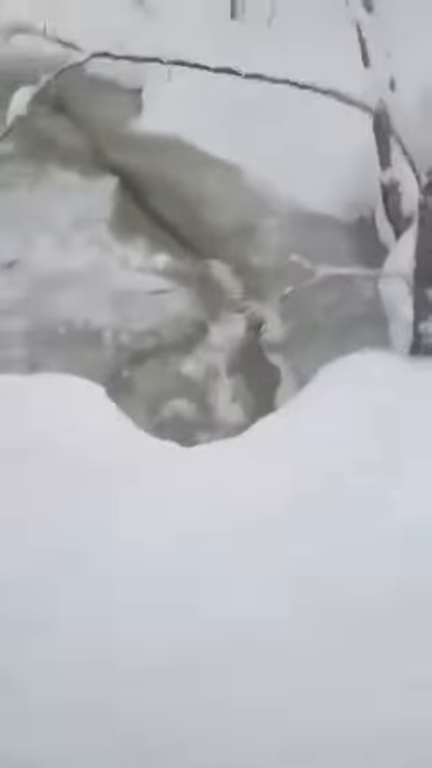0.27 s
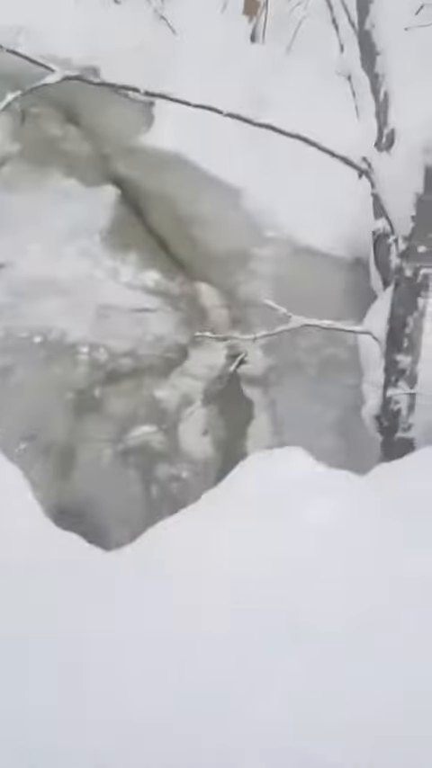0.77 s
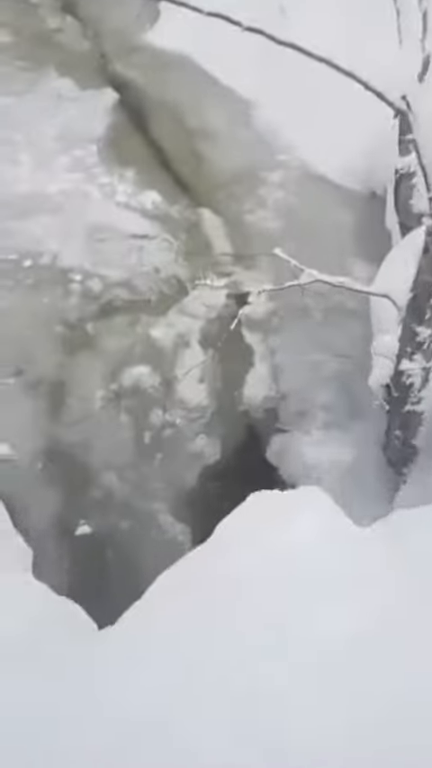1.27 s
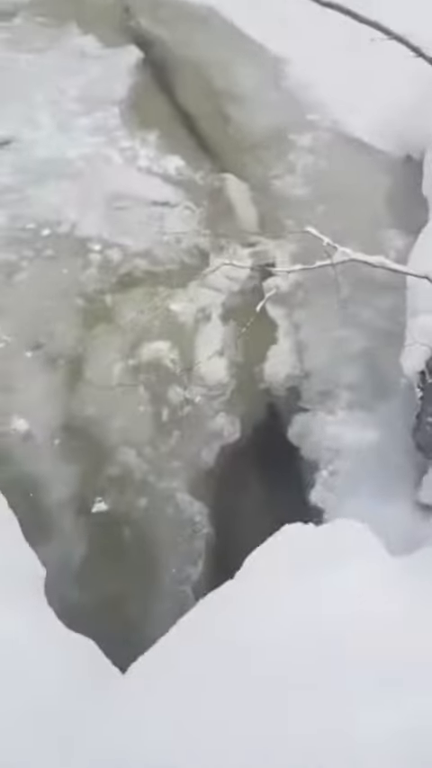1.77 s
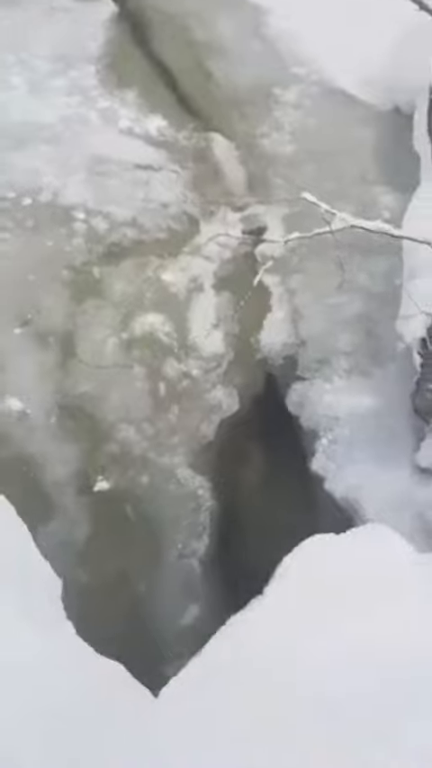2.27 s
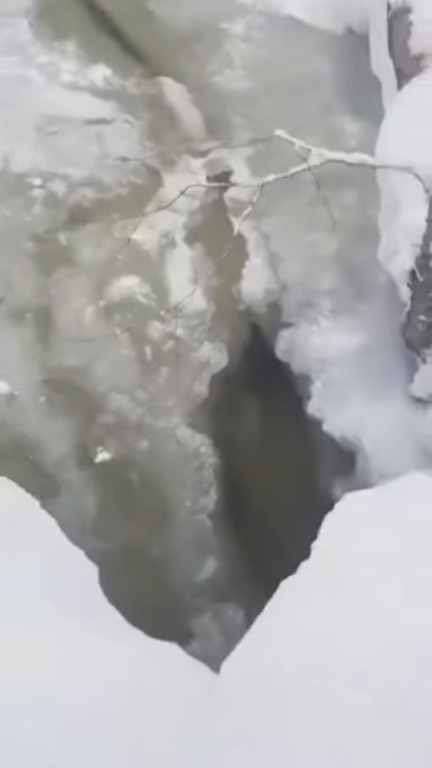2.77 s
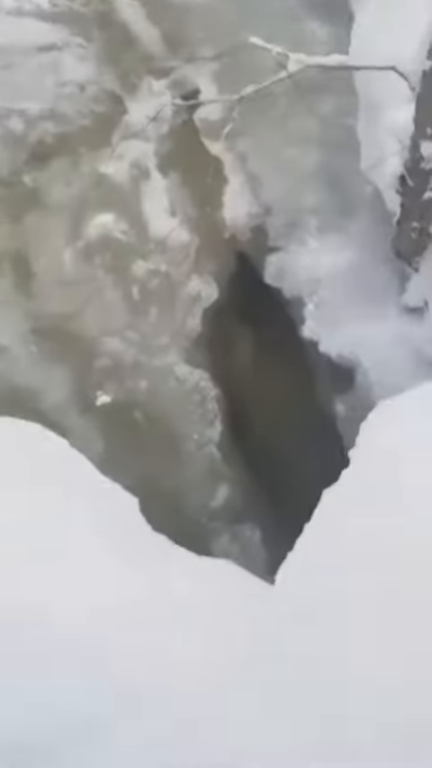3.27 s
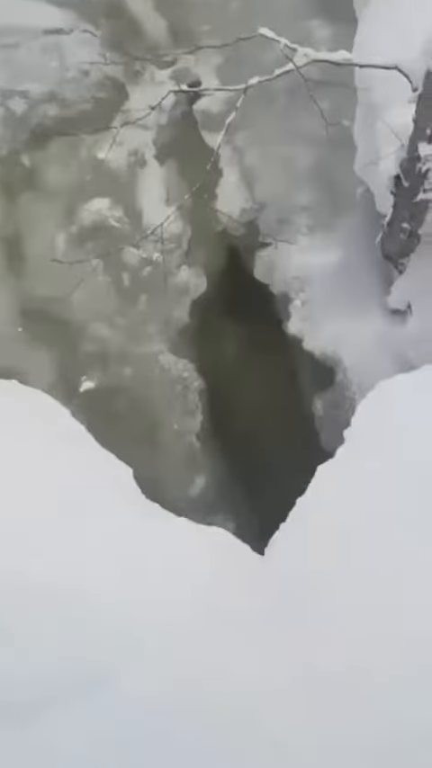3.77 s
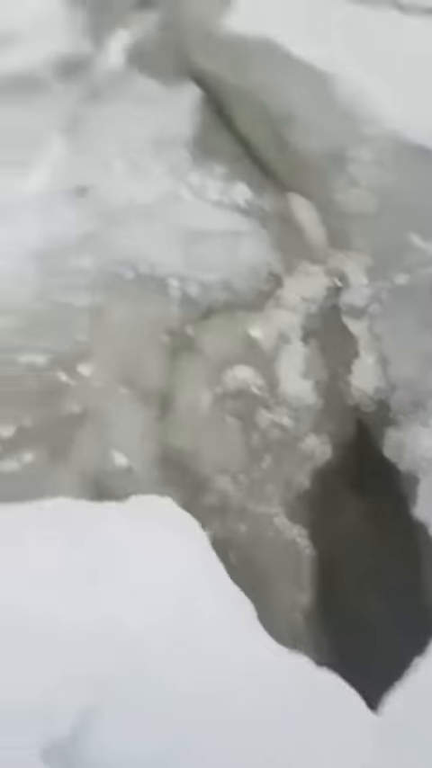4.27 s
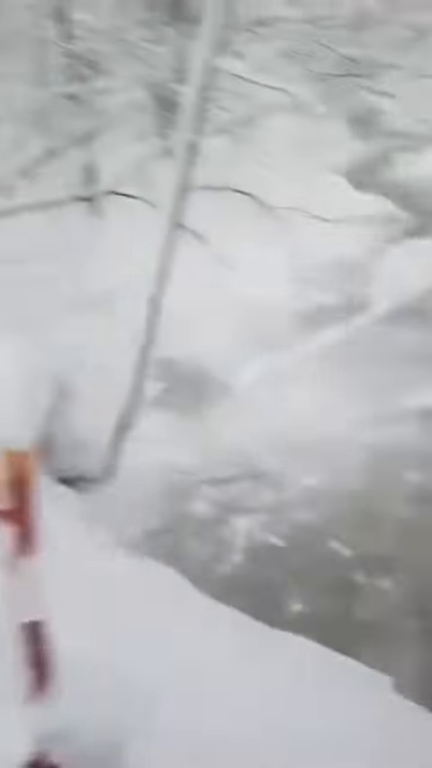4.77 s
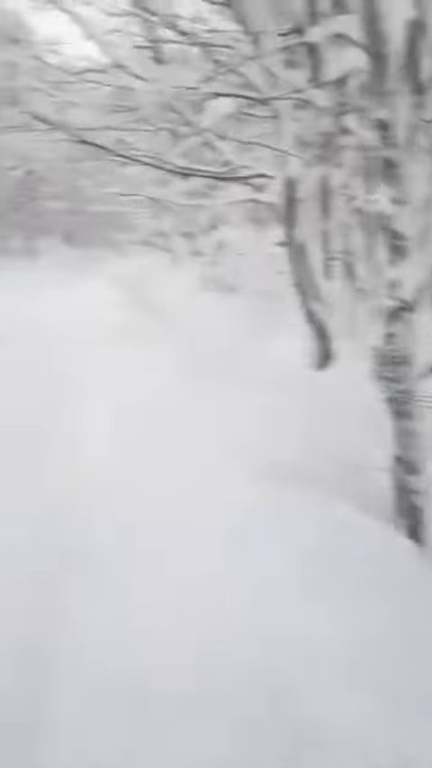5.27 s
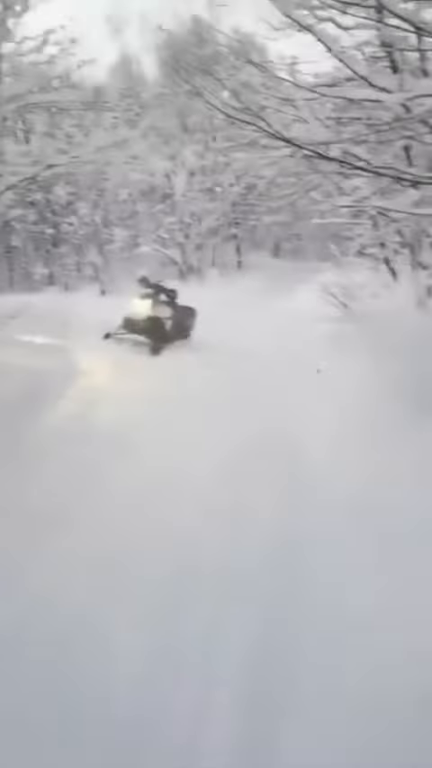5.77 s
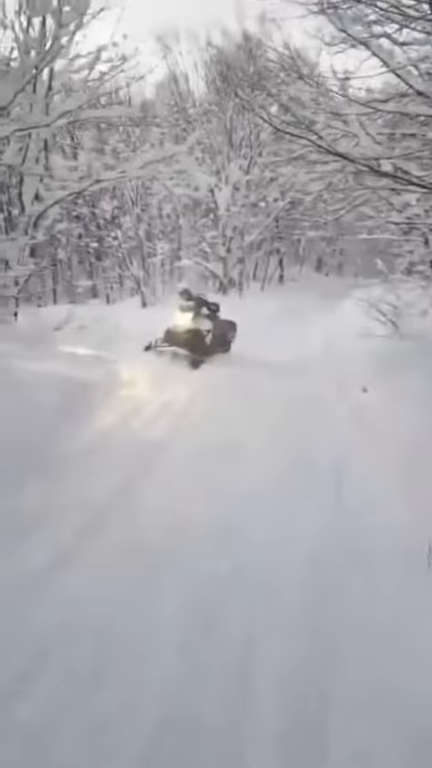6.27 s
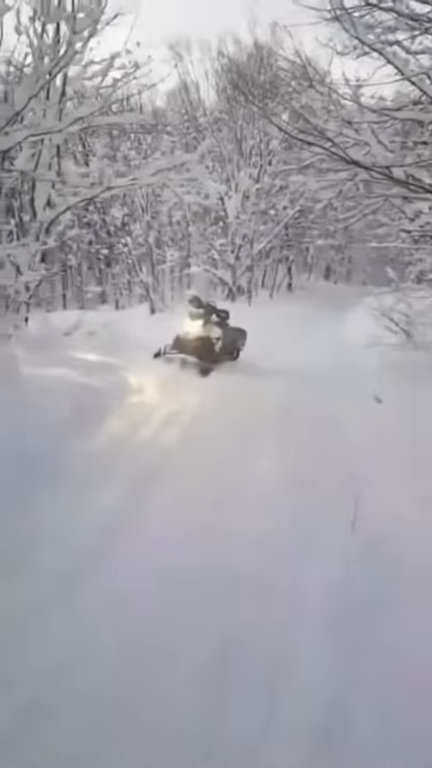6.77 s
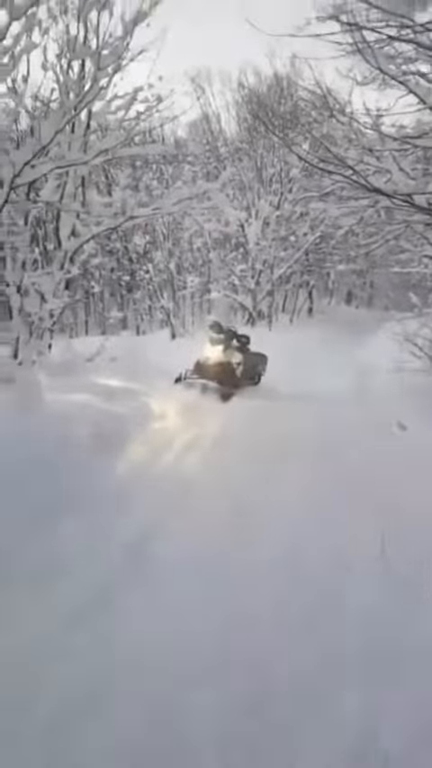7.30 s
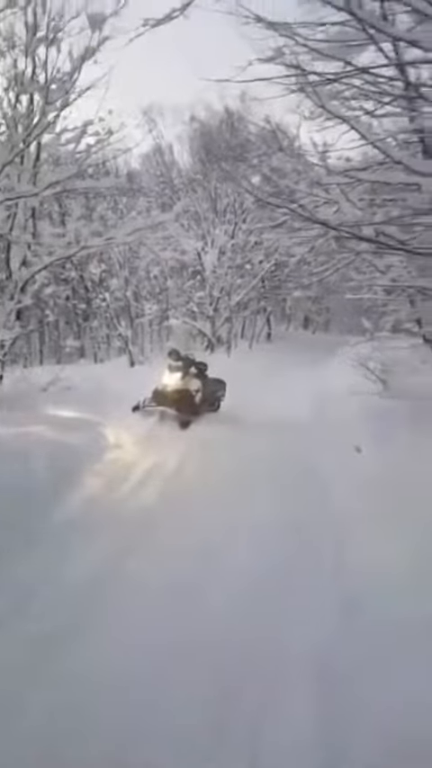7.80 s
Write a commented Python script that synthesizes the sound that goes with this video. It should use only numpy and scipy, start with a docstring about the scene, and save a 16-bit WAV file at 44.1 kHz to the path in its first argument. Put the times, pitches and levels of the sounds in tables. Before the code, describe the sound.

A snowmobile idles with a low, steady throb some way off while boots crunch and squeak in deep snow close by.

```python
"""A snowmobile idles throughout, some way off in a snowy wood, at forty firings a second: the muffler booms,
the engine clatters, the fan whines faintly, and the exhaust rasps whenever the speed sags. At first, close
by, boots take a few firm steps that crunch, crack and squeak in deep snow, and clothing swishes. From 2 s a
half-frozen stream gives three bubbles. Between 3.7 and 5.2 s the phone turns to face the machine and the
boom grows louder. Softer steps follow, over the thin hiss that lies under the whole scene."""
import sys
import numpy as np
from scipy import signal
from scipy.fft import rfft, irfft
from scipy.io import wavfile
from scipy.ndimage import uniform_filter1d

SR = 44100
rng = np.random.default_rng(int(sys.argv[2]) if len(sys.argv) > 2 else 0)


def file_out(sig):
    """Save sig as 16-bit WAV at sys.argv[1]."""
    # one column per channel
    cols = np.atleast_2d(sig).T
    # limit, then scale
    lim = np.clip(cols, -1, 1)
    pcm = np.round(lim * 32767).astype(np.int16)
    wavfile.write(sys.argv[1], SR, pcm)


N = 354475
IDLE_HZ = 40.42  # nominal firing rate, one firing a turn


def undb(db):
    """Amplitude ratio of a level: tenfold for every 20 dB."""
    return 10 ** (np.asarray(db) / 20)


def unit(x):
    """Normalisation to rms 1."""
    return x / np.sqrt(np.mean(x ** 2) + 1e-20)


def curve(rows, column=1):
    """Linear interpolation in time of one column of a table."""
    rows = np.array(rows, float)
    return np.interp(np.arange(N) / SR, rows[:, 0], rows[:, column])


def smooth(x, seconds):
    """Low-pass filtering by a running mean."""
    return uniform_filter1d(x, max(int(seconds * SR), 1), mode="nearest")


def colour(x, spectrum):
    """Minimum-phase filter through (Hz, dB) points; it is circular, so steady sounds start under way."""
    hz, db = np.transpose(spectrum)
    bin_hz = np.maximum(np.arange(N // 2 + 1) * SR / N, 1)
    gain = undb(np.interp(np.log(bin_hz), np.log(hz), db))
    cepstrum = irfft(np.log(gain), N)
    cepstrum[1:N // 2 + 1] *= 2
    cepstrum[N // 2 + 1:] = 0
    return irfft(rfft(x) * np.exp(rfft(cepstrum)), N)


def resonate(x, hz, width_hz):
    """A damped second-order resonator, gain 1 at its centre."""
    return signal.lfilter(*signal.iirpeak(min(hz, SR / 3), hz / width_hz, fs=SR), x)


def ring(x, modes):
    """Modal superposition: neighbouring modes swing in opposite sense."""
    return sum((-1) ** k * undb(db) * resonate(x, hz, width) for k, (hz, width, db) in enumerate(modes))


def wander(rate_hz):
    """Random modulation: Gaussian values joined by straight lines, with a spread near 1."""
    knots = rng.standard_normal(2048)
    return np.interp(np.arange(N) / SR * rate_hz, np.arange(len(knots)), knots)


def grains(per_s, spread_db):
    """Shot noise: clicks at random times, most of them small and a few large."""
    hits = rng.random(N) < per_s / SR
    signs = rng.choice([-1, 1], N)
    sizes = undb(spread_db * np.minimum(rng.exponential(size=N), 4))
    return unit(hits * signs * sizes)


def strokes(turns, at, scatter_db, jitter_s):
    """Impulse train locked to rotation: one pulse at fraction `at` of each turn, uneven in size and time."""
    timing, strength = rng.standard_normal((400, 2)).T
    places = np.interp(np.arange(len(timing)) + at, turns, np.arange(N), -SR, -SR)
    places += jitter_s * SR * timing
    inside = (places >= 0) & (places < N - 1)
    sizes = undb(scatter_db * strength[inside])
    whole, part = np.divmod(places[inside], 1)  # each pulse is shared between two samples
    index = whole.astype(int)
    return np.bincount(index, sizes * (1 - part), N) + np.bincount(index + 1, sizes * part, N)


def gesture(start, length, db, swell_db, attack_share, release_share, edge_s=0.0021):
    """Envelope of a movement: a sloping hold between exponential edges that lengthen with its duration."""
    age = np.arange(N) / SR - start
    held = np.clip(age / max(length, 1 / SR), 0, 1)
    rise = np.minimum(age, 0) / (edge_s + attack_share * length)
    fall = np.maximum(age - length, 0) / (edge_s + release_share * length)
    return undb(db + swell_db * (held - .5)) * np.exp(np.maximum(rise - fall, -50))


def chirps(rows, swell_s):
    """Exponential upward sweeps: short tones that peak after swell_s and die away."""
    out, t = np.zeros(N + SR), np.arange(SR // 15) / SR
    age = t / swell_s
    envelope = (age * np.exp(1 - age)) ** 2
    for s, db, hz, rise in rows:
        phase = 2 * np.pi * np.cumsum(hz * 2 ** (rise * t)) / SR
        start = int(s * SR)
        out[start:start + len(t)] += undb(db) * envelope * np.sin(phase)
    return out[:N]


def hiss():
    """Filtered Gaussian noise: two layers drift in level, so the thin hiss varies in brightness."""
    # spectra of the body and of the top layer: (frequency [Hz], relative density [dB])
    body_spectrum = [(1500, -7.5), (3500, 0), (5000, -1.5), (7200, -5), (8300, -1), (9800, -13),
                     (11500, -8.5), (14000, -7)]
    top_spectrum = [(7000, -10), (10000, -5.5), (11500, -2.5), (14000, -5)]
    # slow course of the hiss: (time [s], body level [dB], top level [dB])
    levels = [(0, -56.5, -56), (1.7, -60.5, -62), (2.05, -62.5, -63), (3.35, -63, -59.5), (3.8, -68, -68),
              (4.3, -62, -59.5), (4.9, -59.5, -57.5), (5.2, -57, -61.5), (8.04, -60, -61.5)]
    body = unit(colour(rng.standard_normal(N), body_spectrum)) * undb(curve(levels))
    top = unit(colour(rng.standard_normal(N), top_spectrum)) * undb(curve(levels, column=2))
    return (body + top * undb(1.1 * wander(7))) * undb(wander(50))


def stream():
    """Bubble resonance: air trapped at the edge of the ice rings briefly with a rising pitch."""
    # bubbles: (time [s], peak level [dB], starting pitch [Hz], rise [octaves/s])
    bubbles = [(2.04, -43, 580, 12), (2.277, -40, 530, 21), (3.663, -45, 607, 5.3)]
    return chirps(bubbles, swell_s=0.0064)


def clothing():
    """Friction noise: rubbing synthetic cloth gives fine, dense clicks that merge into a swish."""
    # cloth friction: (frequency [Hz], relative density [dB])
    cloth_spectrum = [(800, 4), (3000, -6), (5500, -12.5), (7000, -11.5), (8500, -6.5), (10500, -7.5),
                      (13500, -7.5)]
    # a sleeve or trouser leg rubbing: (time [s], duration [s], level [dB], swell [dB])
    swishes = [(0, 0.05, -44, -1), (0.266, .17, -39.5, 5), (.454, 0.0065, -35.5, -3),
               (0.627, 0.021, -40.5, -4), (.95, 0.059, -46, 2), (1.048, 0.18, -46.5, 0),
               (1.418, 0.076, -48, -5), (1.59, 0.3, -51, -13.5), (3.426, 0.015, -50.5, 0),
               (4.3, 0.61, -67, -1)]
    rubbing = sum(gesture(*swish, attack_share=.09, release_share=.12) for swish in swishes)
    friction = grains(per_s=14000, spread_db=2.5) * undb(0.93 * wander(99))
    return unit(colour(friction, cloth_spectrum)) * rubbing


def squeaks():
    """Stick-slip friction: snow under a sole gives short rising tones."""
    # squeaks: (time [s], peak level [dB], starting pitch [Hz], rise [octaves/s])
    slips = [(.624, -20, 687, 1.86), (.945, -25.5, 730, 22), (.952, -31, 1310, 14)]
    return chirps(slips, swell_s=0.0043)


def crust(decay_s=0.0028, width_share=0.47):
    """Brittle fracture: each break in the crust is a brief noise burst, muffled by the snow above."""
    # breaks: (time [s], peak level before the snow filters it [dB], centre frequency [Hz])
    cracks = [(.150, -22, 1400), (.173, -25, 800), (.227, -22.5, 859), (.266, -14.5, 1260),
              (.278, -12.5, 880), (.296, -10, 1040), (.323, -15.5, 900), (.357, -12, 939), (.416, -13, 740),
              (.426, -14.5, 800), (0.553, -15, 860), (.626, -13, 795), (.661, -22, 1100),
              (.951, -12.5, 1070), (1.046, -18, 1500), (1.072, -17, 905), (1.108, -16.5, 1090),
              (1.39, -25, 1100), (1.664, -27, 794), (1.717, -26, 950), (5.304, -26, 600), (6.367, -28, 739),
              (6.714, -24.5, 737), (6.777, -26.5, 656), (6.879, -27, 587)]
    # filtering by the snow: (frequency [Hz], gain [dB])
    snow_response = [(100, -26.5), (400, 7), (800, 0.5), (1500, -4), (2400, -5), (3600, -14), (5000, -14),
                     (14000, -55)]
    out, t = np.zeros(N + SR), np.arange(SR // 20) / SR
    age = t / decay_s
    envelope = np.sqrt(age) * np.exp(-2 * age)
    for s, db, hz in cracks:
        crack = resonate(rng.standard_normal(len(t)) * envelope, hz, hz * width_share)
        start = int(s * SR)
        out[start:start + len(t)] += crack / np.abs(crack).max() * undb(db)
    return colour(out[:N], snow_response)


def footsteps(bite_db=-15, shear_hz=3500):
    """Granular compaction: snow packs in jerks, each slip a burst of tiny breaking grains."""
    # crunch of firm and of soft snow: (frequency [Hz], relative density [dB])
    firm_spectrum = [(60, 8), (180, 11.5), (400, 1), (600, 4.5), (900, 4.5), (1400, -3), (2000, -5.5),
                     (2700, -13.5), (4100, -18.5), (5200, -28.5), (7000, -21.5), (8500, -22.5),
                     (14000, -36)]
    soft_spectrum = [(50, -4), (120, 4), (230, 6), (350, -4), (550, -4.5), (750, -5.5), (1100, -11.5),
                     (1650, -14), (2100, -23), (2800, -28), (5000, -40), (14000, -51)]
    # a boot pressing down: (time [s], duration [s], level [dB], swell [dB], firmness [0-1])
    steps = [(0.193, 0.22, -34, 19.5, 1), (0.454, 0.012, -29.5, -4, 1), (.625, .024, -28, 3, 0.99),
             (0.945, 0.05, -32, -2, 1), (1.043, .14, -31, -0.5, 0.99), (1.191, .15, -31.5, 2, 0.27),
             (1.534, .22, -44.5, 6, 0), (5.293, 0.16, -32, 4.5, 0.03), (6.103, 0.198, -37, 7, 0.2),
             (6.373, 0.078, -33, 5, 0.04), (6.511, .15, -30, 1.5, 0.03), (6.7, 0.11, -42, 0, 0.03),
             (6.873, 0.021, -29.5, 7, 0)]
    firm = colour(grains(per_s=2500, spread_db=2.5) * undb(2.1 * wander(170)), firm_spectrum)
    soft = colour(grains(per_s=3000, spread_db=2) * undb(0.73 * wander(160)), soft_spectrum)
    weight, sinking = 0, 0
    for *movement, firmness in steps:
        press = gesture(*movement, attack_share=0.029, release_share=0.026)
        weight += np.sqrt(firmness) * press
        sinking += np.sqrt(1 - firmness) * press
    # under the full weight the crystals shear, and the crunch turns brighter
    crystals = grains(per_s=4900, spread_db=6.0) * undb(2 * wander(168.6))
    shear = resonate(resonate(crystals, shear_hz, width_hz=1700), shear_hz, width_hz=2300)
    bite = unit(shear) * undb(bite_db) * weight / weight.max()
    return (unit(firm) + bite) * weight + unit(soft) * sinking


def fan(turns, boom_db, tone_db=-63, wash_re_boom_db=-21, blades_per_turn=17.55):
    """Blade-passing tone and turbulence: the belt-driven fan whines over a restless wash of air."""
    # rushing air: (frequency [Hz], relative density [dB])
    wash_spectrum = [(25, 0), (60, 3.5), (100, 11), (140, -14.5), (220, 5), (350, 5), (550, 0),
                     (1000, -1.5), (1500, -7.5), (2200, -10), (3200, -16.5), (5000, -32.5), (9000, -33)]
    blade = np.sin(2 * np.pi * blades_per_turn * turns + .9 * wander(25))
    wash = colour(rng.standard_normal(N), wash_spectrum) * undb(1.25 * wander(40))
    whine = blade * undb(4.8 * wander(5.3))
    return unit(whine) * undb(tone_db) + unit(wash) * undb(boom_db + wash_re_boom_db)


def panel(turns, level_db, hz=413, width_hz=12):
    """Forced vibration: the tenth firing harmonic slides in and out of a cowl panel's narrow resonance."""
    shake = strokes(turns, at=0, scatter_db=1.5, jitter_s=.00008)
    hum = resonate(resonate(shake, hz, width_hz), hz, 3 * width_hz)
    return unit(hum) * undb(level_db)


def clatter(turns, level_db, tick_db=2, rattle_db=8):
    """Impact excitation: piston knocks and a rattle ring the casing each turn, valve ticks every other."""
    # modes of the engine casing and cowl: (frequency [Hz], bandwidth [Hz], relative gain [dB])
    casing_modes = [(715, 28.4, 5.5), (940, 44, 1.5), (1134, 98, 4), (1189, 52, 5), (1298, 87, 1),
                    (1675, 300, -4), (1990, 600, -8.5)]
    knocks = unit(strokes(turns, at=0.42, scatter_db=4.5, jitter_s=.0002))
    ticks = unit(strokes(turns / 2, at=.31, scatter_db=1.5, jitter_s=.0002))
    rattle_age = (turns - .45) % 1
    rattle = unit(rng.standard_normal(N) * np.exp(-rattle_age))
    blows = knocks + undb(tick_db) * ticks + undb(rattle_db) * rattle
    casing = ring(resonate(blows, hz=960, width_hz=1400), casing_modes)
    return unit(casing) * undb(level_db)


def exhaust(turns, boom_db, rasp_db):
    """Source and filter: each firing booms in the muffler; its sharp edge rings the tailpipe less evenly."""
    # muffler response: (frequency [multiples of IDLE_HZ], relative gain [dB])
    muffler = [(.5, -33), (1, -9), (2, -17), (3, 5.5), (4, 2.5), (5, -9), (6, -29), (8, -55.5), (12, -61)]
    # tailpipe modes: (frequency [Hz], bandwidth [Hz], relative gain [dB])
    tailpipe_modes = [(232.4, 48, -1.5), (280.5, 35, 1), (326.5, 36.3, -1.5)]
    firings = strokes(turns, at=0, scatter_db=.45, jitter_s=.00014)
    boom = colour(firings.mean() - firings, [(k * IDLE_HZ, db) for k, db in muffler])
    edges = strokes(turns, at=.04, scatter_db=1.3, jitter_s=.00016)
    rasp = ring(resonate(edges, hz=271, width_hz=132), tailpipe_modes)
    return unit(boom) * undb(boom_db) - unit(rasp) * undb(rasp_db)


def snowmobile(start_turns=.38, waver_hz=8, waver_turns=.012):
    """Phase locking: one crank drives every part; its speed and the way the phone faces set the levels."""
    # the hunting idle: (time [s], firing rate [Hz])
    idle = [(0, 41.01), (0.22, 39.12), (0.65, 41.01), (1.23, 38.56), (1.34, 40.54), (1.53, 37.67),
            (1.62, 40.16), (1.96, 41.28), (2.89, 39.97), (2.97, 41.05), (3.13, 38.82), (3.35, 40.16),
            (3.58, 38.82), (3.84, 41.05), (3.97, 39.68), (4.18, 41.5), (4.47, 40.29), (4.76, 41.56),
            (5.04, 37.98), (5.2, 39.7), (5.6, 38.76), (5.73, 41.42), (6.03, 39.65), (6.23, 40.59),
            (6.95, 39.29), (7.45, 40.07), (7.75, 40.23), (8.04, 40.38)]
    turns = np.cumsum(curve(idle)) / SR
    turns = turns * np.round(turns[-1]) / turns[-1]  # whole turns, so the idle runs evenly at both ends
    turns = turns + start_turns + waver_turns * smooth(wander(waver_hz), 1 / waver_hz)
    excess_hz = np.gradient(turns) * SR - IDLE_HZ
    change_hz_per_s = smooth(np.gradient(excess_hz) * SR, seconds=0.14)
    facing = np.interp(np.arange(N) / SR, (3.66, 5.2), (0, 1))
    # the boom grows louder as the phone turns to face the machine; speed changes barely alter it
    boom_db = -26 + 2.5 * facing + 0.02 * change_hz_per_s
    # a slow idle rasps, a fast one clatters and hums
    rasp_db = -44.5 + facing - 1.65 * excess_hz
    clatter_db = -48 - 0.3 * facing + 0.3 * excess_hz
    panel_db = -54.5 + excess_hz
    return (exhaust(turns, boom_db, rasp_db) + panel(turns, panel_db)
            + clatter(turns, clatter_db) + fan(turns, boom_db))


def scene():
    """Free-field superposition: deep snow absorbs all echoes, so every source arrives dry."""
    walker = footsteps() + crust() + squeaks() + clothing()
    return (snowmobile() + walker + stream() + hiss())[None]


def record(dry, cutoff_hz=14000):
    """Band limiting: the phone cuts the top treble with a steep low-pass."""
    return signal.sosfilt(signal.ellip(10, .2, 80, cutoff_hz, fs=SR, output="sos"), dry)


dry = scene()
out = record(dry)
file_out(out)
```